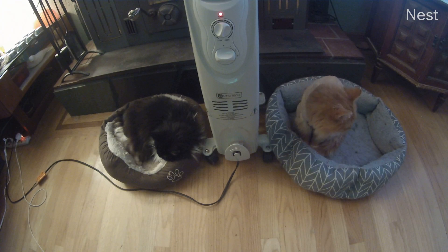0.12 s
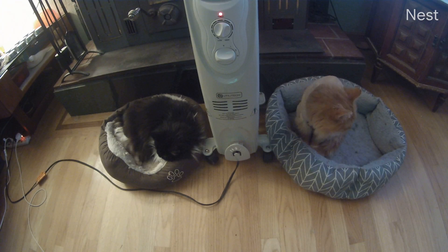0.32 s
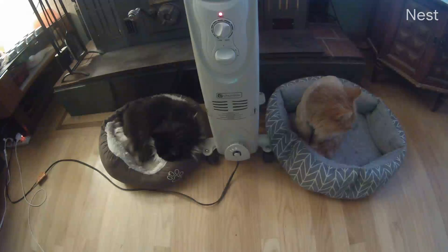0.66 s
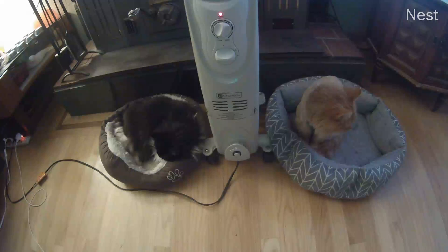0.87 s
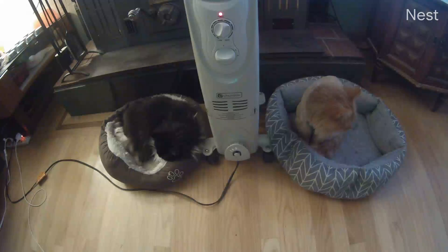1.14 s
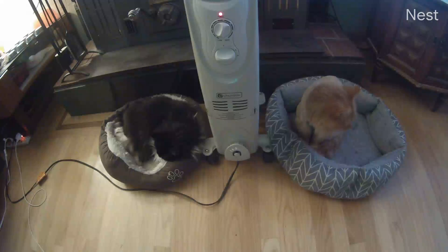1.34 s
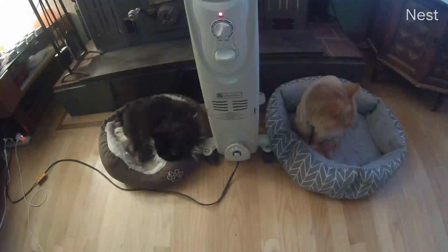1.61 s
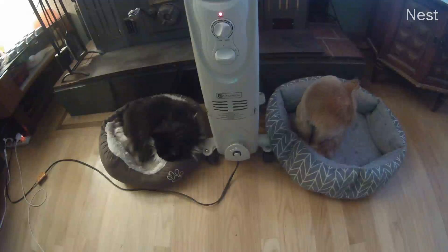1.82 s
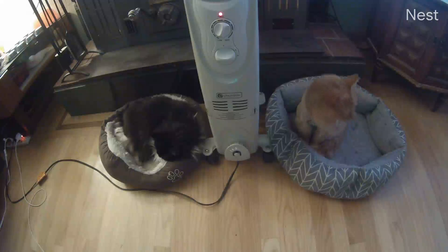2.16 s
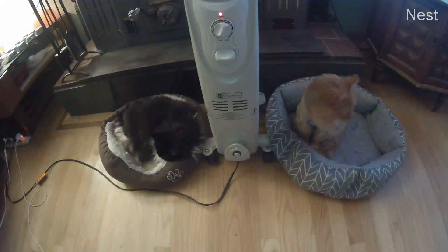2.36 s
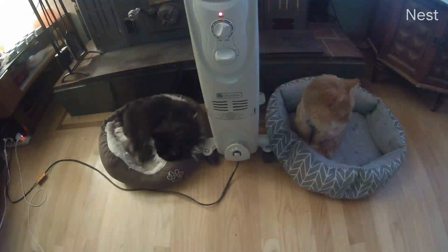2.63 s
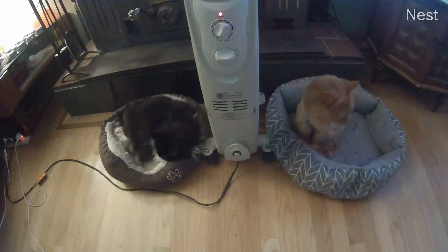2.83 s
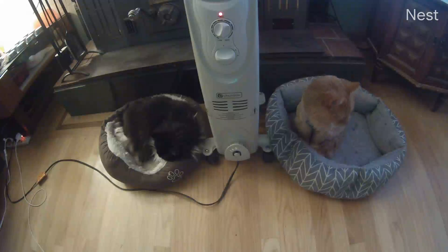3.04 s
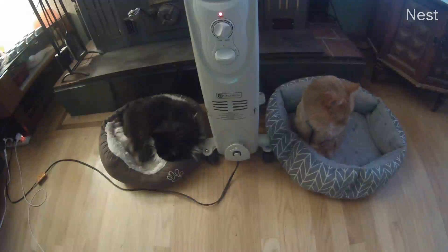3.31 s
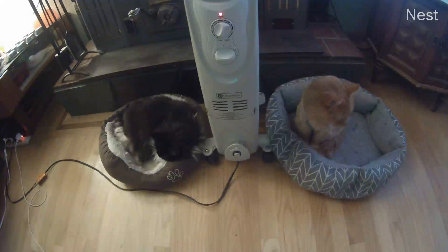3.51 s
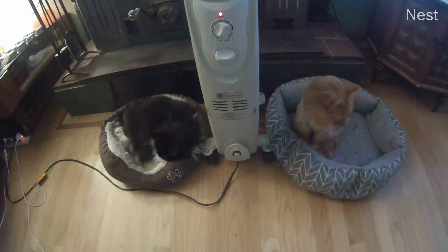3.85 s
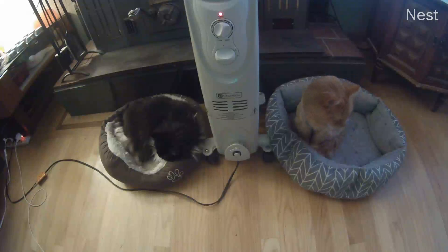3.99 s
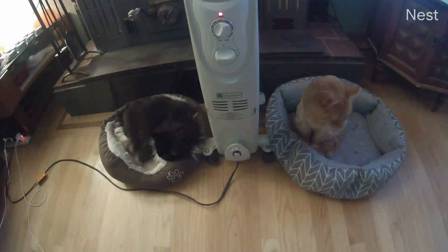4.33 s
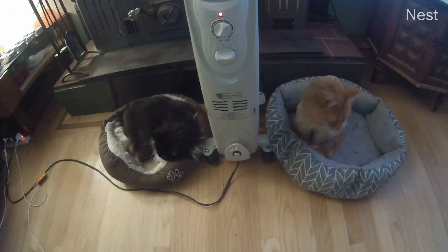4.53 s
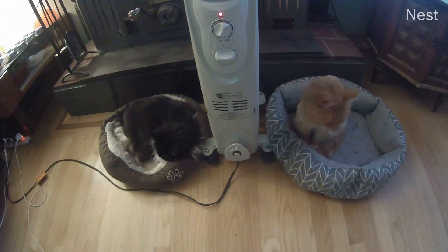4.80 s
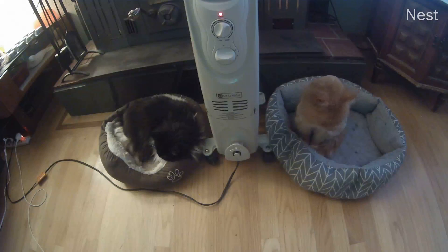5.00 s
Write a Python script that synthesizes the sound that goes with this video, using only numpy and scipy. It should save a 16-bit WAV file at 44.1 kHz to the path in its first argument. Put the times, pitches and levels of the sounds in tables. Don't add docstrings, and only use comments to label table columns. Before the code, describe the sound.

Slow unseen footsteps in slippers: soft brushing scuffs and three sharp wooden claps, with a short room echo and faint microphone hiss.

```python
import sys
import numpy as np
from scipy import signal
from scipy.fft import rfft, irfft
from scipy.io import wavfile
from scipy.ndimage import uniform_filter1d

SR = 44100
rng = np.random.default_rng(int(sys.argv[2]) if len(sys.argv) > 2 else 0)


def to_wav(sig):
    pcm = np.clip(np.atleast_2d(sig), -1, 1) * 32767
    pcm = np.round(pcm).astype(np.int16)
    wavfile.write(sys.argv[1], SR, pcm.T)


def convert_level_to_amplitude(level_db):
    exponent = np.asarray(level_db, float) / 20
    return 10 ** exponent


N = 227538


def tint(x, points, peaks=()):
    hz = np.maximum(np.fft.rfftfreq(len(x), 1 / SR), 1)
    point_hz, point_db = np.transpose(points)
    db = np.interp(np.log(hz), np.log(point_hz), point_db, left=-60, right=-60)
    for peak_hz, width_hz, peak_db in peaks:
        db = db + peak_db / (1 + (2 * (hz - peak_hz) / width_hz) ** 2)
    half = len(x) // 2
    fold = np.r_[1, np.full(half - 1, 2), np.zeros(len(x) - half)]
    cepstrum = irfft(np.log(convert_level_to_amplitude(db)), len(x)) * fold
    return irfft(rfft(x) * np.exp(rfft(cepstrum)), len(x))


def unit(x):
    return x / np.sqrt(np.mean(x ** 2))


def add(out, start_s, sound):
    i = max(int(start_s * SR), 0)
    out[i:i + len(sound)] += sound[:N - i]


def in_room(contact, part_db, wet_db=0, echoes=()):
    # low_hz, high_hz, t60_s, room_db (against the direct sound)
    parts = [
        (276.7, 1250, 0.34, 7.5),
        (1242, 4800, .4, 3.5),
        (4080, 12000, 0.37, 8.5),
        (28.5, 350, 0.32, -2.5),
    ]
    t = np.arange(int(.7 * SR)) / SR
    response_sum = 0
    for (low_hz, high_hz, t60_s, room_db), db in zip(parts, part_db):
        decay = np.exp(-np.log(1000) * t / t60_s)
        tail = rng.standard_normal(len(t)) * decay * np.minimum(t / .006, 1)
        tail *= 1 + 1.5 * np.exp(-t / 0.012)
        response = convert_level_to_amplitude(room_db + wet_db) * tail / np.sqrt(np.sum(tail ** 2))
        response[0] = 1
        for delay_s, echo_db in echoes:
            response[int(delay_s * SR)] += convert_level_to_amplitude(echo_db)
        band = signal.butter(2, [low_hz, high_hz], "band", fs=SR, output="sos")
        response_sum = response_sum + convert_level_to_amplitude(db) * signal.sosfilt(band, response)
    return signal.fftconvolve(contact, response_sum)


def hiss():
    # frequency_hz, density_db (per Hz)
    hiss_colour = [(60, -67), (150, -44), (200, -15), (330, -6.5), (600, -4), (1400, -2.5), (2400, -1.5),
                   (3500, -6), (5150, -6.5), (5400, -23.5), (5800, -11), (7000, -16.5), (7600, -21.5),
                   (7950, -32)]
    return convert_level_to_amplitude(-59) * unit(tint(rng.standard_normal(N), hiss_colour))


def scuff(level_db, thud_db, treble_db, rise_s, drag_s):
    t = np.arange(int(.3 * SR)) / SR
    release_s, grit_db, biggest_grain = .015, 3, 5.5
    release = np.clip((rise_s + drag_s + release_s - t) / release_s, 0, 1)
    pressure = np.clip(t / rise_s, 0, 1) ** 2 * release
    grain_size = np.minimum(rng.exponential(size=len(t)), biggest_grain)
    grains = unit(rng.standard_normal(len(t)) * convert_level_to_amplitude(grit_db * grain_size))
    thump_db = 7 + .6 * treble_db
    wet_db = -3.5 - 0.72 * max(level_db + 45, 0)
    return convert_level_to_amplitude(level_db) * in_room(pressure * grains, (thud_db, 0, treble_db, thump_db), wet_db)


def swipes():
    # start_s, level_db (rms), treble_db, length_s
    brushes = [(0.221, -71.5, -21, 0.037), (.53, -55.5, 8, 0.064), (0.566, -48.5, 0.5, 0.1),
               (.982, -55, -4, 0.045), (1.152, -55, -4.5, 0.058), (1.577, -55.5, 2.5, 0.037),
               (2.508, -39, -11, 0.055), (2.579, -49, -15.5, .05), (2.747, -52.5, -20, 0.041),
               (3.734, -56.5, 7, 0.067), (3.914, -55, 7.5, 0.044), (4.915, -60, -11.5, .05),
               (5.083, -61, -8.5, 0.063)]
    rise_share = .45
    out = np.zeros(N)
    for start_s, level_db, treble_db, length_s in brushes:
        thud_db = -5 - 0.7046 * treble_db
        rise_s, drag_s = rise_share * length_s, (1 - rise_share) * length_s
        add(out, start_s, scuff(level_db, thud_db, treble_db, rise_s, drag_s))
    return out


def landings():
    # contact_s (full load), level_db (rms), treble_db, drag_s
    touchdowns = [(0.744, -42, -6.5, 0.017), (1.356, -48, 3.5, 0.032), (1.63, -47.5, -13, 0.027),
                  (2.232, -50, 6.5, 0.056), (2.4824, -29, -3.5, 0.012), (3.055, -50.5, 3.5, 0.085),
                  (3.292, -44.5, -4.5, 0.0091), (3.301, -43.5, -15.5, 0.014), (3.366, -56.5, -11, 0.025),
                  (3.858, -45.5, 2.5, 0.048), (4.0824, -31, -1, 0.0093), (4.684, -50.5, 1.5, 0.051)]
    out = np.zeros(N)
    for contact_s, level_db, treble_db, drag_s in touchdowns:
        rise_s = .005 * convert_level_to_amplitude(.5 * (-45 - level_db))
        add(out, contact_s - rise_s, scuff(level_db, -4, treble_db, rise_s, drag_s))
    return out


def claps():
    # start_s, peak_db, thud_db, treble_db
    strikes = [(0.7591, -22.5, -6, -5), (.7645, -22.5, -7, -12.5), (.771, -30, -7.5, -6),
               (1.352, -41, 5.5, 1.5), (1.6255, -35, -3.5, -18), (2.234, -41, 1, -2), (2.482, -33, -8, 5),
               (2.4912, -18.5, -5.5, -11), (3.054, -42.5, 10, -7), (3.3005, -33, 4, -1.5),
               (3.855, -32.5, -0.5, -6.5), (3.882, -32.5, -9.5, -9), (3.918, -37.5, -5.5, -1),
               (4.09, -19.5, -6, -10.5), (4.683, -45, 4, 0), (4.71, -44.5, -6.5, -2),
               (4.9364, -38.5, 0.5, -11)]
    # delay_s, echo_db
    near_echoes = [
        (.0028, -8),
        (.0056, -2),
        (0.01, -12.5),
    ]
    t = np.arange(int(.3 * SR)) / SR
    rattle_s = .007
    out = np.zeros(N)
    for start_s, peak_db, thud_db, treble_db in strikes:
        clap = convert_level_to_amplitude(-28) * rng.standard_normal(len(t)) * np.exp(-t / rattle_s)
        clap[0] = 1
        thump_db = -6 + 1.5 * thud_db
        sound = in_room(clap, (thud_db, 0, treble_db, thump_db), wet_db=-3, echoes=near_echoes)
        add(out, start_s, convert_level_to_amplitude(peak_db + 15.5) * sound)
    return out


def steps():
    # frequency_hz, level_db
    step_colour = [(20, -33), (60, -44), (150, -19.5), (250, -12.5), (500, 5.5), (1200, 4.5), (2500, 2.5),
                   (4000, 2.5), (5200, -1.5), (5700, -7), (7000, -8), (7600, -11.5), (7950, -21.5)]
    # frequency_hz, width_hz, level_db
    boards = [
        (572, 65, -1),
        (986, 83, 4.5),
        (1153, 270, 1.5),
        (1856, 20, 10),
        (2217, 200, 6.5),
        (2668, 420, 4.5),
    ]
    return tint(swipes() + landings() + claps(), step_colour, boards)


def quantise(blocks, windows, edges, top, finer_db, ahead_db):
    # frequency_hz, over_db (band's level), frame_db (least, whole frame), least_db
    coarse = [(30, -5, -39, -81.5), (126, 2, -33, -73), (246, 2, -32.5, -67), (720, 4.5, -15, -59.5),
              (1490, 6.5, -17, -53.5), (4090, 10, -7.5, -71), (5620, 10, -5, -59), (6820, 8.5, -9, -64),
              (7420, 12, -13, -61), (7460, 5.5, -13, -62)]
    size = edges[-1]
    times = np.arange(2 * size) + .5 + size / 2
    basis = np.cos(np.pi / size * np.outer(times, np.arange(size) + .5)) * np.sqrt(2 / size)
    lines = (blocks * windows) @ basis * (np.arange(size) < top)
    width = np.diff(edges)
    level = np.sqrt(np.add.reduceat(lines ** 2, edges[:-1], axis=-1) / width)
    for b in range(1, len(edges) - 1):
        level[..., b] = np.maximum(level[..., b], convert_level_to_amplitude(-7) * level[..., b - 1])
    level[..., :-2, :] = np.maximum(level[..., :-2, :], convert_level_to_amplitude(ahead_db) * level[..., 2:, :])
    hz, *columns = np.transpose(coarse)
    band_hz = np.array(edges[1:]) * 16000 / 2 / size
    over_db, frame_db, least_db = (np.interp(band_hz, hz, column) for column in columns)
    step = level * convert_level_to_amplitude(over_db - finer_db + 1.8 * rng.standard_normal(level.shape))
    whole = np.sqrt(np.mean(lines ** 2, axis=tuple(range(1, lines.ndim)), keepdims=True))
    step = np.maximum(step, convert_level_to_amplitude(frame_db - finer_db) * whole)
    step = np.repeat(np.maximum(step, convert_level_to_amplitude(least_db)), width, axis=-1)
    rounded = np.floor((np.abs(lines) / step) ** .75 + .4054) ** (4 / 3)
    return (np.sign(lines) * rounded * step) @ basis.T * windows


def camera(x):
    sharp_s = [
        .76,
        2.49,
        4.09,
    ]
    long_edges = [*range(0, 88, 8), *range(88, 196, 12), *range(196, 260, 16),
                  260, 280, 300, 320, 344, 368, 396, 424, 456, 492, 532, 572, 616, 664, 716, 772, 832, 896, 960, 1024]
    short_edges = [*range(0, 32, 4), 32, 40, 48, 60, 72, 88, 108, 128]
    cam_sr, frame, grid = 16000, 1024, 591
    short, edge = frame // 8, frame * 7 // 16
    x = signal.resample_poly(x, cam_sr // 100, SR // 100)
    x = np.pad(x, (2 * frame - grid, 2 * frame))
    count = len(x) // frame - 1
    starts = frame * np.arange(count)
    sharp = ((np.array(sharp_s) * cam_sr - grid + 3 * frame / 2) // frame).astype(int)
    small = signal.windows.kaiser_bessel_derived(2 * short, 6 * np.pi)
    windows = np.tile(signal.windows.kaiser_bessel_derived(2 * frame, 4 * np.pi), (count, 1))
    quick = np.r_[np.zeros(edge), small[:short], np.ones(edge)]
    windows[sharp + 1, :frame] = quick
    windows[sharp - 1, frame:] = quick[::-1]
    windows[sharp] = 0
    places = starts[:, None] + np.arange(2 * frame)
    small_starts = starts[sharp, None] + edge + short * np.arange(frame // short)
    small_places = small_starts[..., None] + np.arange(2 * short)
    power = x ** 2 + 1e-12
    swing_db = 10 * np.log10(uniform_filter1d(power, size=96) / uniform_filter1d(power, size=frame))
    swing_db = swing_db - np.clip(swing_db, -2.5, 2.5)
    swing_db[small_places] = 0
    shape = convert_level_to_amplitude(0.82 * uniform_filter1d(uniform_filter1d(swing_db, size=48), size=48))
    x = x / shape
    top = np.full((count, 1), frame)
    top[sharp[:, None] + np.arange(1, 4)] = frame * 7 // 8 + 16
    out = np.zeros(len(x))
    long_blocks = quantise(x[places], windows, long_edges, top, finer_db=0, ahead_db=-60)
    np.add.at(out, places, long_blocks)
    short_blocks = quantise(x[small_places], small, short_edges, short * 7 // 8, finer_db=13.5, ahead_db=-2)
    np.add.at(out, small_places, short_blocks)
    return signal.resample_poly((out * shape)[2 * frame - grid:], SR // 100, cam_sr // 100)


def scene():
    return (steps() + hiss())[None]


def top_cut(x):
    return signal.sosfilt(signal.butter(12, 8850, fs=SR, output="sos"), x)


def record(dry):
    padded = np.pad(dry[0], (0, SR // 10))
    mix = camera(padded)[None, :N]
    return top_cut(mix)


dry = scene()
out = record(dry)
to_wav(out)
```